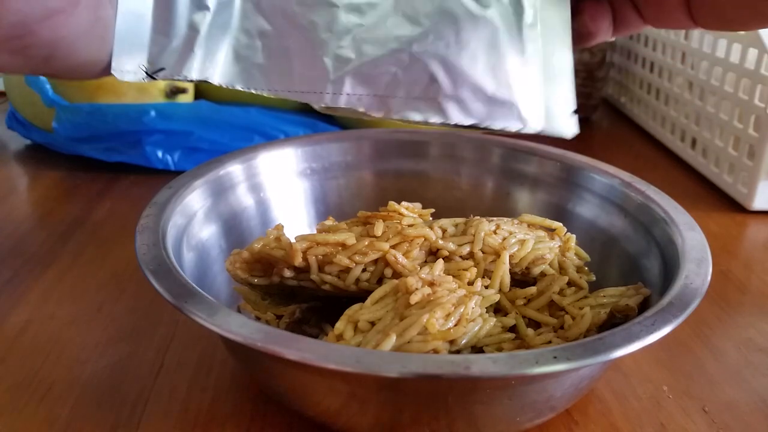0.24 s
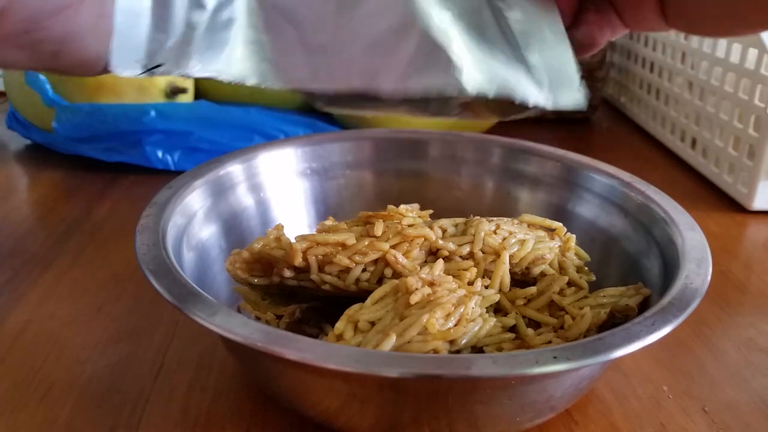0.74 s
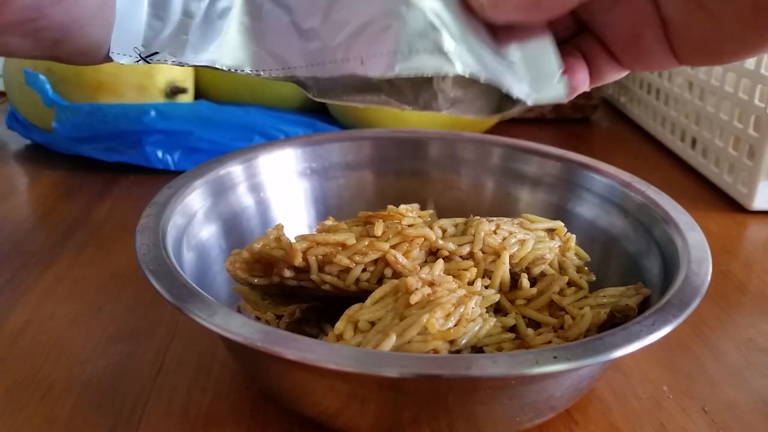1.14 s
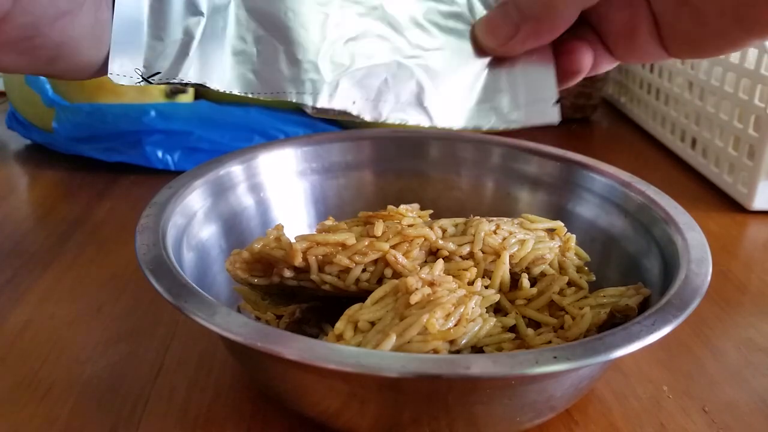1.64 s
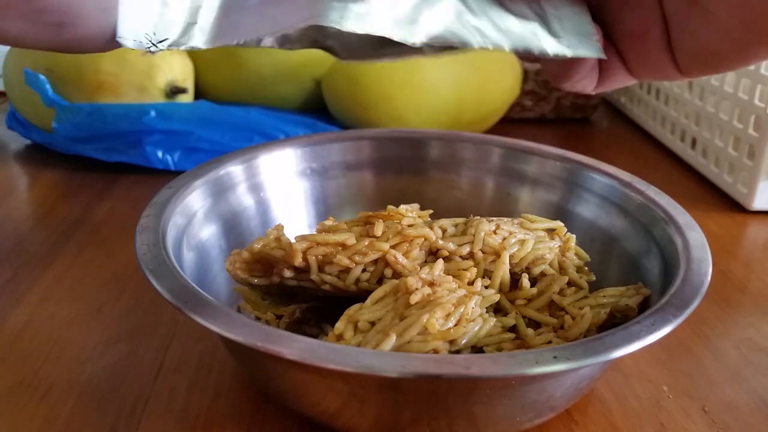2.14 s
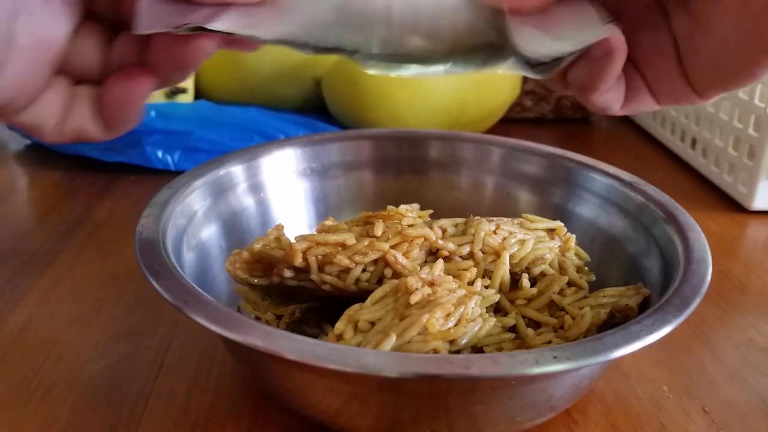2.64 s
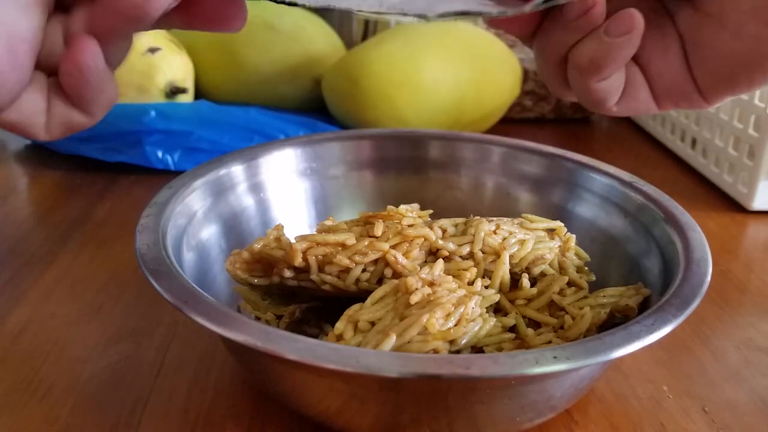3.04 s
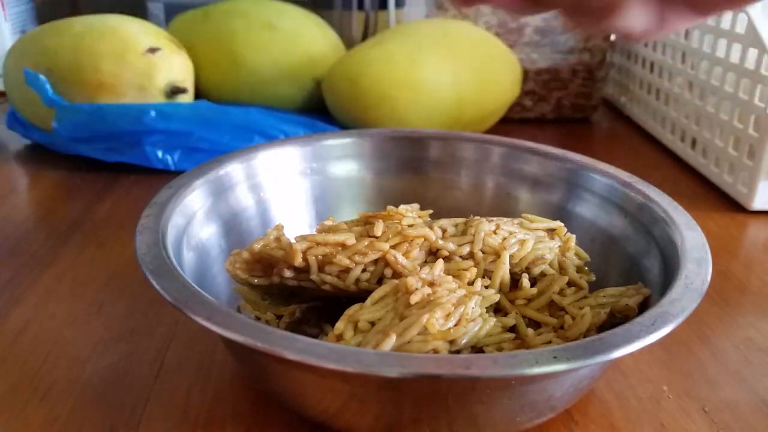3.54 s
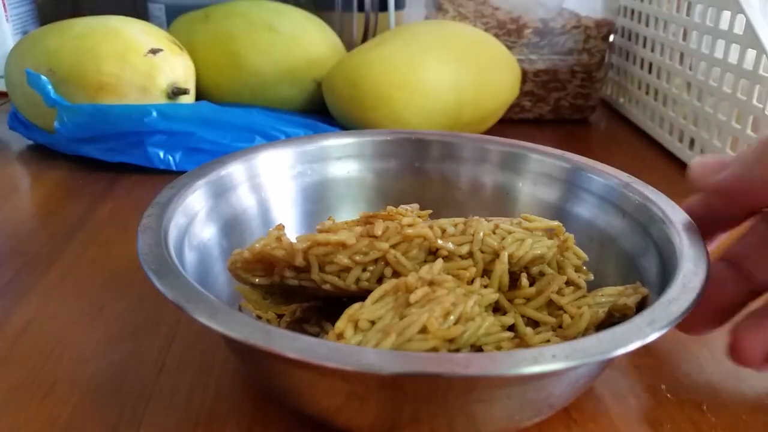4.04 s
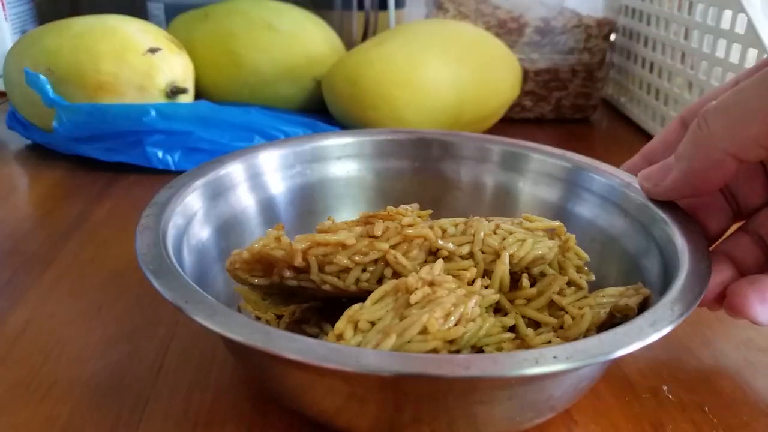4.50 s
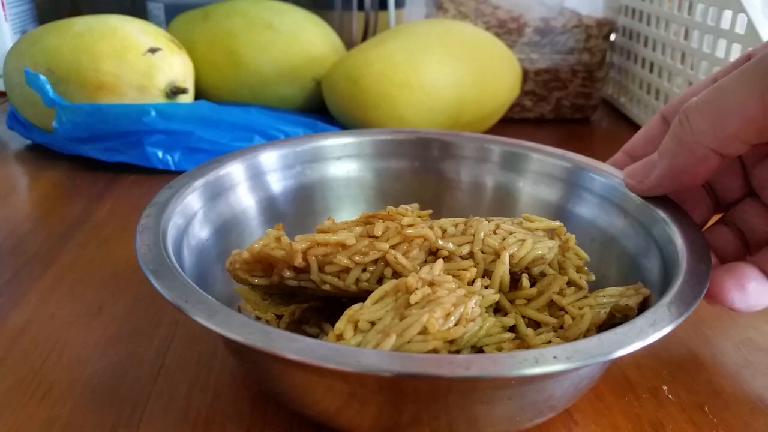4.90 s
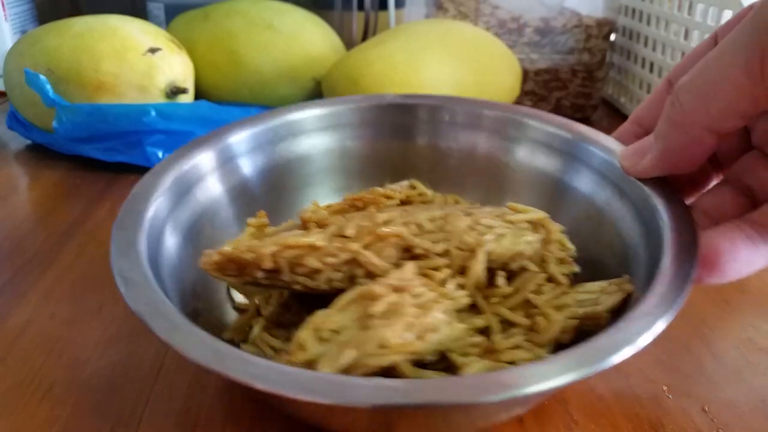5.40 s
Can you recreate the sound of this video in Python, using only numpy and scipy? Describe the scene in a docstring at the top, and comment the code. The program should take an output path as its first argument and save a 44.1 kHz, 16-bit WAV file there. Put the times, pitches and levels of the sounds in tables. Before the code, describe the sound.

A close stereo take in a small, lightly reverberant kitchen, with a quiet low rumble and hum throughout. From 0 s a foil pouch is already being squeezed and shaken: one sharp snap at the start, then scattered dry crackles and hollow panel pops, thickening between 0.4 and 1.05 s. After a brief lull, more snaps come at 1.3 and 1.45 s. From about 1.6 to 2.4 s the crinkling is loudest and densest, crisp and bright over a rustling bed, with a soft low bump near 2.2 s. Another burst falls around 2.55 s, then sparse crinkles at 2.75, 3.1 and 3.55-3.65 s, ending by 3.9 s. A faint thin whine sits behind from about 2.2 to 3.7 s. A light touch on the steel bowl comes at 4.4 s, finger scuffs at 4.8 s, and a quick group of dull wooden knocks at 5.05 s, without metallic ringing. Faint rubbing follows as the bowl is lifted.

```python
"""Foil pouch emptied over a steel bowl

A foil pouch is squeezed and shaken empty over a steel bowl, close to the microphone in a kitchen.
Each squeeze builds, holds and relaxes: click trains rustle, and damped swings snap with noise bursts.
Then the bowl knocks on the wooden table as short damped swings, scuffing clicks grip it, and more
knocks follow. Filtered noise hums behind it all, and sparse decaying echoes make the room ring."""
import sys
import numpy as np
from scipy import signal
from scipy.fft import rfft, irfft, next_fast_len
from scipy.io import wavfile

SR = 44100
rng = np.random.default_rng(int(sys.argv[2]) if len(sys.argv) > 2 else 0)


def put_to_file(sound):
    """Save the sound as 16-bit audio at rate SR, in the file named by the first command-line argument."""
    columns = np.atleast_2d(sound).T  # one column per channel
    safe = np.clip(columns, -1, 1)
    whole_steps = np.round(safe * 32767)
    wavfile.write(sys.argv[1], SR, whole_steps.astype(np.int16))


N = 249606
LEAD = 4096  # samples computed ahead of time zero
SIZE = next_fast_len(N + 10 * LEAD)  # working length, samples
EDGE_HZ = 15900

# relative spectrum of the fine treble of foil: f/Hz, level/dB
TREBLE = [(2500, -28), (4200, 1), (6200, -3.5), (8800, -20), (15000, -16)]
# relative spectrum of the whole sheet flexing: f/Hz, level/dB
SHEET = [(40, -11.5), (250, 0.5), (750, -4), (1200, -5), (4000, -59.5)]


def amp(db):
    """Decibel law: level to amplitude ratio."""
    return 10 ** (np.asarray(db) / 20)


def unit(x):
    """Normalisation to a root-mean-square of one."""
    return x / np.sqrt(np.mean(x ** 2) + 1e-20)


def read(points, hz):
    """Linear interpolation of a table on a logarithmic frequency axis."""
    f, value = np.transpose(sorted(points))
    return np.interp(np.log(hz + 1), np.log(f + 1), value)


def add(mix, s, sound):
    """Superposition: lays a sound into the mix at time s."""
    part = mix[..., LEAD + round(s * SR):][..., :sound.shape[-1]]
    part += sound[..., :part.shape[-1]]


def colour(x, points, size=2048):
    """Minimum-phase filtering: the Hilbert transform of the log gain gives a causal phase."""
    log_gain = np.log(amp(read(points, abs(np.fft.fftfreq(size, 1 / SR)))))
    spectrum = np.exp(np.conj(signal.hilbert(log_gain)))
    taps = np.fft.ifft(spectrum).real[:size // 2]
    return signal.oaconvolve(x, np.array(taps, ndmin=x.ndim), axes=-1)[..., :x.shape[-1]]


def pair(x, likeness):
    """Partial coherence: the second of two unrelated signals is made partly like the first."""
    first, other = x
    c = np.clip(likeness, 0, 1)
    return np.array([first, c * first + np.sqrt(1 - c ** 2) * other])


def diffuse(x):
    """Diffuse-field coherence: the two ports agree in the bass and differ in the treble."""
    # likeness of the room sound at the two ports: f/Hz, coherence/(0-1)
    port_likeness = [(100, 0.88), (500, 0.65), (2000, 0.18)]
    size = x.shape[-1]
    hz = np.fft.rfftfreq(size, 1 / SR)
    return irfft(pair(rfft(x), read(port_likeness, hz)), size)


def room_tone(hum_hz=83, hum_db=-58, whine_hz=3591, whine_db=-68):
    """Narrow-band noise: a broad household rumble, a hum, and a thin whine that comes and goes."""
    # relative spectrum of the rumble: f/Hz, level/dB
    rumble_spectrum = [(20, -11.5), (90, -3.5), (240, -6.5), (330, -13.5), (700, -19), (1100, -30),
                       (2800, -41), (3700, -32), (4500, -40.5), (5800, -62.5), (8800, -69.5), (14000, -51)]
    rumble_db = -48.5
    hz, t = np.fft.rfftfreq(SIZE, 1 / SR), (np.arange(SIZE) - LEAD) / SR

    def noise(gain):
        """Spectral shaping of white noise in a diffuse field."""
        white = rng.standard_normal((2, SIZE))
        return unit(diffuse(irfft(rfft(white) * gain, SIZE)))

    def line(centre_hz, width_hz):
        """Resonance curve: noise confined to a narrow line."""
        return noise(1 / (1 + ((hz - centre_hz) / width_hz) ** 2))

    whine = line(whine_hz, 49) * np.interp(t, [2.2, 2.45, 3.5, 3.75], [0, 1, 1, 0])
    rumble = amp(rumble_db) * noise(amp(read(rumble_spectrum, hz)))
    hum = amp(hum_db) * line(hum_hz, 1.6)
    return rumble + hum + amp(whine_db) * whine


def kitchen(x, early_db=-15, tail_db=-13, early_s=0.0021):
    """Reverberation: quick reflections off table and bowl, then the tail of the room."""
    # reverberation time of the room: f/Hz, T60/s
    decay_times = [(300, 0.43), (4000, 0.34), (14000, 0.58)]
    t = np.arange(8 * LEAD) / SR
    signs = np.sign(rng.standard_normal((2, len(t))))
    taps = signs * (rng.random((2, len(t))) < 3000 / SR) * (t > .002)  # sparse echoes
    early = taps * np.exp(-t / early_s)
    hz, age, z = signal.stft(taps, SR)
    decay = amp(-60 * age / read(decay_times, hz)[:, None])
    tail = signal.istft(z * decay, SR)[1][:, :len(t)]
    response = sum(amp(db) * h / np.linalg.norm(h, axis=1, keepdims=True)
                   for h, db in ((early, early_db), (tail, tail_db)))
    return signal.fftconvolve(x[None], diffuse(response), axes=1)[:, :SIZE]


def rotating_room(x, turn_hz=3.7, count=4):
    """Rotating reverberation: sound passes in turn through echo patterns, so no single one rings."""
    turns = turn_hz * np.arange(SIZE) / SR
    return sum(kitchen(x * np.maximum(np.cos(2 * np.pi * (turns - k / count)), 0))
               for k in range(count))


def grains(per_s, spread_db, likeness):
    """Shot noise: random tiny clicks, their sizes spread in decibels."""
    present = rng.random(SIZE) < per_s / SR
    size = amp(spread_db * np.minimum(rng.exponential(size=SIZE), 3))
    return pair(np.sign(rng.standard_normal((2, SIZE))), likeness) * present * size


def sized(x, db, count=240):
    """Onset level: each blow is scaled by its energy over the first few milliseconds."""
    return x * amp(db)[:, None] / np.sqrt(np.mean(x[..., :count] ** 2, -1, keepdims=True))


def blows(rows, rise_s, burst_s, tail_s, tail_db, cycles, crack_db, treble_db, panel_db, sheet_db,
          likeness):
    """Impulsive excitation: a burst of micro-slips with a rattle, and a damped swing."""
    # relative spectrum of the crack: f/Hz, level/dB
    crack_spectrum = [(500, -10.5), (1000, -10.5), (1600, 5.5), (1850, 2.5), (2250, 8), (2550, 3),
                      (2950, 4), (3500, -5), (4200, -18), (9000, -79)]
    s, level_db, bright_db, hz, swing_db = np.transpose(rows)
    t = np.arange(LEAD // 2) / SR
    burst, rattle = np.exp(-(t / burst_s) ** 4), amp(tail_db) * np.exp(-t / tail_s)
    envelope = (1 - np.exp(-t / rise_s)) * (burst + rattle)
    noise = rng.standard_normal((len(s), 3, 2, len(t))).transpose(1, 2, 0, 3)
    slips, ticks, pushes = noise * envelope
    crack = sized(colour(pair(slips, likeness), crack_spectrum), level_db + crack_db)
    sharp = pair(ticks, likeness) * (0.366 + np.exp(-t / 0.00033))  # weighted to the onset
    treble = sized(colour(sharp, TREBLE), level_db + bright_db + treble_db)
    sheet = sized(colour(pushes[0], SHEET), swing_db + sheet_db)
    turns = hz[:, None] * t
    swing = np.sin(2 * np.pi * turns) * (1 - np.exp(-turns / .5)) * np.exp(-turns / cycles)
    sounds = crack + treble + sheet + sized(swing, swing_db + panel_db)
    out = np.zeros((2, SIZE))
    for k, start in enumerate(s):
        add(out, start, sounds[:, k])
    return out


def bumps(decay_s=0.0075):
    """Heavily damped oscillation: soft low bumps of hands, pouch and bowl."""
    # t/s, f/Hz, level/dB
    low_bumps = [(0.574, 158, -32), (1.042, 114, -36), (2.226, 87, -29.5), (4.433, 89, -36),
                 (5.067, 162, -26)]
    t, out = np.arange(2 * LEAD) / SR, np.zeros(SIZE)
    envelope = np.e * t / decay_s * np.exp(-t / decay_s)  # peaks at one
    for s, hz, db in low_bumps:
        add(out, s, amp(db) * envelope * np.sin(2 * np.pi * hz * t))
    return out


def lift():
    """Stick-slip friction: fingers scuff the rim, and noodles shift faintly as the bowl is lifted."""
    # hand working on the rim: t/s, rubbing level/dB
    grip = [(4.79, -61), (4.825, -44.5), (4.9, -57.5), (5.1, -57), (5.429, -49), (5.66, -50)]
    # relative spectrum of rubbing on steel: f/Hz, level/dB
    scuff_spectrum = [(150, -4.5), (550, 11.5), (2200, -9), (7000, -43)]
    s, db = np.transpose(grip)
    effort = amp(np.interp((np.arange(SIZE) - LEAD) / SR, s, db, left=-120))
    return effort * unit(colour(grains(per_s=450, spread_db=7.5, likeness=0.44), scuff_spectrum))


def bowl():
    """Damped impact: the bowl knocks dully on the table, as short damped swings without a ring."""
    # touches and tips, before the offsets below:
    # t/s, click level/dB, treble level re click/dB, knock f/Hz, knock level/dB
    knocks = [(4.431, -51, -17.5, 673, -38.5), (5.0373, -42.5, -46, 727, -28.5),
              (5.0659, -43.5, -44, 690, -23.5), (5.0938, -42.5, -6.5, 1330, -34)]
    return blows(knocks, rise_s=0.00062, burst_s=0.0026, tail_s=0.03, tail_db=-18.5, cycles=3.0,
                 crack_db=6.5, treble_db=0.0, panel_db=-2.5, sheet_db=-1.5, likeness=0.62)


def hand_effort():
    """Exponential build-up and relaxation: squeezes and shakes rise over a light steady hold."""
    # squeezes and shakes: t/s at full effort, hold/s, effort level/dB
    squeezes = [(-.02, 0.018, -43.5), (0.158, 0.013, -45.5), (0.382, .03, -49.5), (0.592, .11, -48),
                (.82, 0.023, -49), (1.28, 0.041, -50), (1.608, 0.058, -34), (1.888, 0.093, -34.5),
                (2.141, .11, -34.5), (2.536, 0.023, -35), (2.755, .015, -44), (3.119, .015, -50),
                (3.527, 0.042, -51.5), (3.782, 0.0072, -55.5)]
    # between squeezes the fingers keep the foil stirring, until the pouch is put away
    holding_db, put_away_s, put_away_fade_s = -60, 3.83, 0.11
    # a long squeeze builds more slowly (extra s per s of hold)
    build_s, slower_per_hold, relax_s = .016, .12, 0.033
    t = (np.arange(SIZE) - LEAD) / SR
    effort = amp(holding_db) * np.exp(-np.maximum(t - put_away_s, 0) / put_away_fade_s)
    for s, hold, db in squeezes:
        before, after = np.maximum(s - t, 0), np.maximum(t - s - hold, 0)
        shape = np.exp(-before / (build_s + slower_per_hold * hold) - after / relax_s)
        effort = np.hypot(effort, amp(db) * shape)
    return effort


def buckles(per_s, low_hz, high_hz, cycles, count=24):
    """Snap-through resonance: small facets click over at random, each with its own pitch."""
    t, out = np.arange(LEAD // 8) / SR, np.zeros((2, SIZE))
    for hz in np.geomspace(low_hz, high_hz, count):
        facet = np.sin(2 * np.pi * hz * t) * np.exp(-hz * t / cycles) * np.sqrt(hz)
        clicks = grains(per_s / count, spread_db=0.0, likeness=0.2)
        out += signal.oaconvolve(clicks, facet[None], axes=1)[:, :SIZE]
    return out


def rustle(effort, crackle_db=-3, fizz_db=-25, flex_db=-7):
    """Crackling noise: tiny buckles crackle and fizz; sheet flexing grows more slowly with effort."""
    facets = buckles(per_s=750, low_hz=1000, high_hz=3730, cycles=2.2)
    fizz = colour(grains(per_s=330, spread_db=6.5, likeness=0.36), TREBLE)
    flex = colour(grains(per_s=400, spread_db=4.0, likeness=1.0), SHEET)
    fine = effort * (amp(crackle_db) * unit(facets) + amp(fizz_db) * unit(fizz))
    return fine + amp(flex_db) * effort ** 0.83 * unit(flex)


def small_creases(effort, range_db=4, treble_range_db=12, octaves=1, count=170):
    """Threshold release: each step of gathered strain frees a small crease, louder with effort."""
    # full rate is reached at the yield effort; loudness growth is in dB per dB
    full_per_s, yield_db, crack_db, growth = 48, -51, -44.5, 0.62
    # treble and panel levels are relative to the crack
    treble_db, panel_db, typical_hz = -27, -1.5, 793
    strain = np.cumsum(np.minimum(effort / amp(yield_db), 1) ** 2) * full_per_s / SR
    wait, size, bright, tone, swing = rng.uniform(-0.92, 1, (count, 5)).T
    at = np.searchsorted(strain, np.arange(count) + .5 * (1 + wait))
    effort_db = 20 * np.log10(effort[np.minimum(at, SIZE - 1)] + 1e-12)
    db = crack_db + growth * (effort_db - yield_db)
    return np.transpose([(at - LEAD) / SR, db + range_db * size, treble_db + treble_range_db * bright,
                         typical_hz * 2 ** (octaves * tone), db + panel_db + range_db * swing])


def settle(rows, wait_s=0.0099, drop_db=-10, spread_db=3, scatter=0.47):
    """Load transfer: a neighbouring crease gives way soon after, typically weaker, at another pitch."""
    s, crack_db, bright_db, hz, panel_db = np.transpose(rows)
    late, size, tone, swing = rng.standard_normal((len(s), 4)).T
    return np.transpose([s + wait_s * np.exp(.5 * late), crack_db + drop_db + spread_db * size,
                         bright_db, hz * np.exp(scatter * tone),
                         panel_db + drop_db + spread_db * swing])


def scene(count=11):
    """Shading and delay: sources lie nearer the left port; the right is filtered and count samples late."""
    # big creases snapping, before the offsets of blows:
    # t/s, crack level/dB, treble level re crack/dB, flipping panel f/Hz, panel level/dB
    snaps = [(-.03, -24, -6.5, 810, -44), (.155, -36, -23, 656, -38.5), (.19, -51.5, -1.5, 900, -58),
             (.242, -32, -45, 767, -32.5), (.297, -44, -42, 278, -34.5), (.39, -40, -43, 604, -30),
             (.402, -32.5, -44.5, 336, -34.5), (.444, -27, -26.5, 990, -38),
             (.497, -26.5, -21.5, 1046, -31), (.526, -39, -35, 340, -32.5), (.582, -37.5, -50, 201, -26.5),
             (.6326, -28, -45, 305, -33), (.664, -27.5, -23, 374, -25), (.6944, -34.5, -39, 759, -31.5),
             (.717, -38, -47, 1090, -32.5), (.8136, -25.5, -36, 793, -31.5),
             (.827, -41.5, -11, 1168, -31.5), (.8577, -41, -32, 830, -31.5), (.868, -34.5, -35, 546, -32.5),
             (.9706, -28.5, -24, 770, -25.5), (1.043, -37, -22.5, 231, -34.5),
             (1.262, -29, -31, 681, -23.5), (1.28, -26.5, -34, 695.6, -36), (1.286, -31, -12, 1250, -27),
             (1.4296, -26, -25.5, 352, -28.5), (1.4507, -37.5, -14, 520, -39.5),
             (1.6176, -34, -21, 345, -21), (1.657, -35.5, -5, 397, -39), (1.672, -26.5, -15, 295, -23.5),
             (1.85, -32.5, -15, 758.3, -29.5), (1.872, -23.5, -46, 1087, -34.5),
             (1.897, -23.5, -15.5, 926, -34), (1.9225, -25, -18, 720, -27),
             (1.974, -23.5, -16.5, 1190, -24.5), (2.0225, -23, -25, 223, -32),
             (2.097, -29.5, -16.5, 440, -32.5), (2.1366, -26.5, -30, 684, -25.5),
             (2.149, -22.5, -31, 1254, -35), (2.169, -23, -7.5, 1160, -20.5),
             (2.202, -19.5, -17, 730, -28.5), (2.228, -26, -3.5, 1190, -25.5), (2.2465, -24, -40, 830, -29),
             (2.292, -22, -14.5, 705, -28), (2.3376, -31.5, -16, 755, -36), (2.3806, -24, -12, 1280, -29.5),
             (2.407, -32, -12, 1317, -31.5), (2.532, -29, -12, 1173, -31), (2.541, -24, -16, 1438, -39),
             (2.623, -38, -20, 660, -33.5), (2.712, -48, -12, 640, -40), (2.7595, -40, -12.5, 1390, -29.5),
             (3.093, -38, -22, 524, -45), (3.1206, -38, -14, 1210, -37), (3.136, -36, -12.5, 609, -34.5),
             (3.362, -61.5, -1, 1320, -44.5), (3.546, -36, -12, 617.8, -41), (3.6605, -30, -12, 594, -29)]
    # shading of the far port: f/Hz, level/dB
    shade = [(150, -8.5), (1000, -9), (2300, -26.5), (4200, -0.5), (8000, -7), (13000, -3.5)]
    effort = hand_effort()
    background = room_tone()
    handling = rustle(effort) + bumps() + bowl() + lift()
    creases = np.vstack([snaps, settle(snaps), small_creases(effort)])
    pouch = blows(creases, rise_s=0.00028, burst_s=0.0032, tail_s=0.0049, tail_db=-46, cycles=2.0,
                  crack_db=1, treble_db=1.5, panel_db=0.5, sheet_db=0, likeness=0.13)
    left, right = pouch + handling
    direct = np.array([left, np.roll(colour(right, shade), count)])
    reflected = rotating_room(left) * amp([[0], [-3]])
    return (direct + reflected + background)[:, LEAD:LEAD + N]


def record(dry):
    """Band limitation: a linear-phase low-pass sets the recorder's upper edge."""
    low_pass = signal.firwin(511, EDGE_HZ, window=("kaiser", 9), fs=SR)
    return signal.oaconvolve(dry, low_pass[None], "same")


dry = scene()
out = record(dry)
put_to_file(out)
```